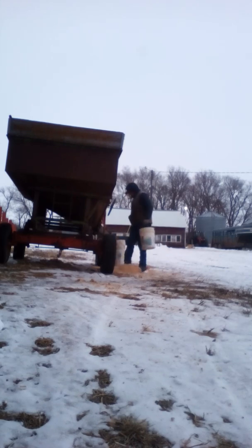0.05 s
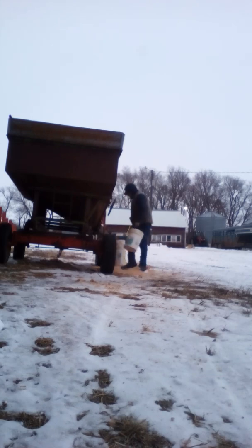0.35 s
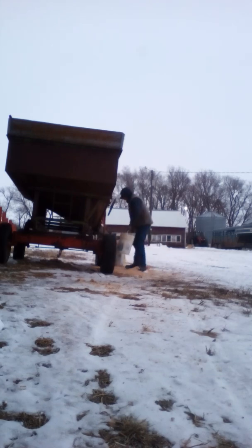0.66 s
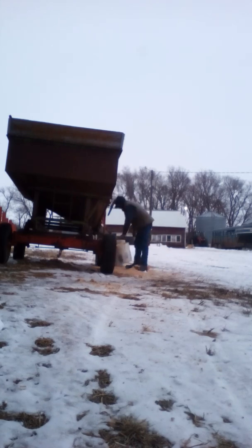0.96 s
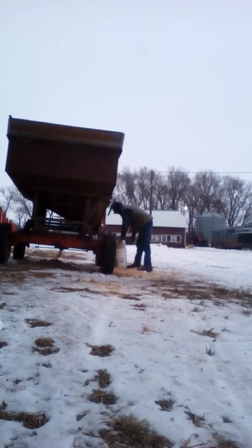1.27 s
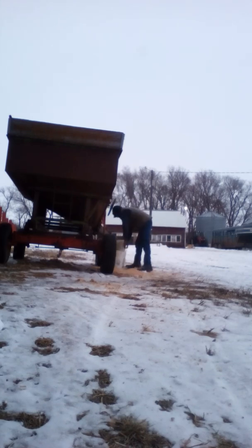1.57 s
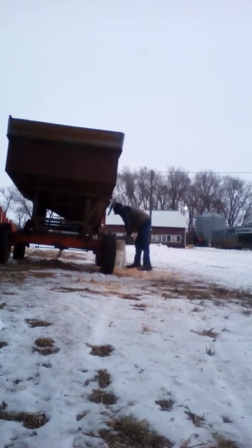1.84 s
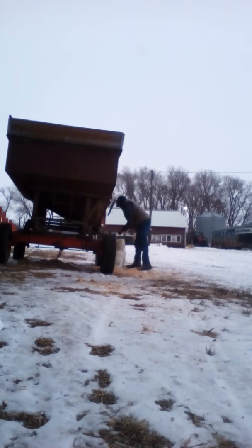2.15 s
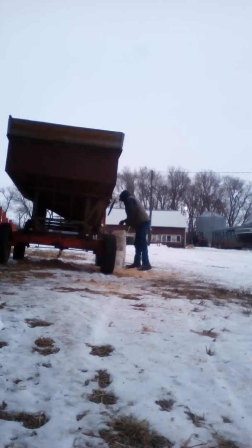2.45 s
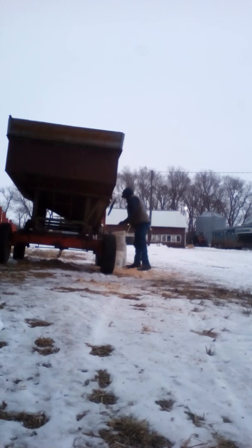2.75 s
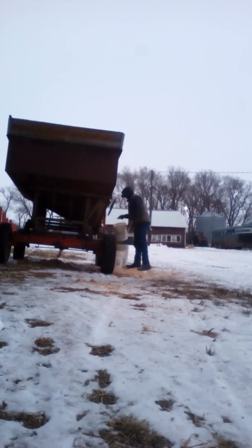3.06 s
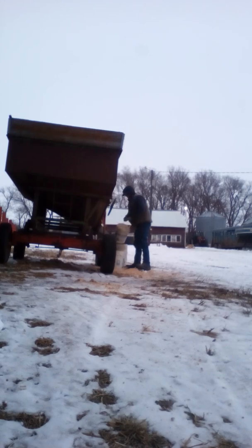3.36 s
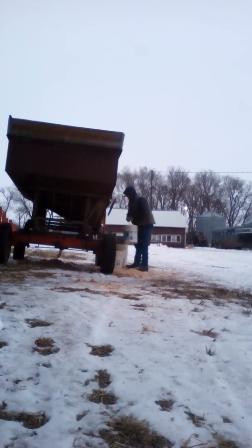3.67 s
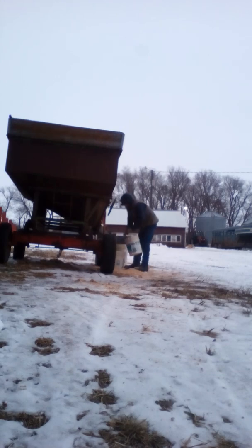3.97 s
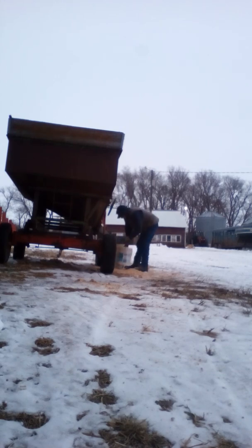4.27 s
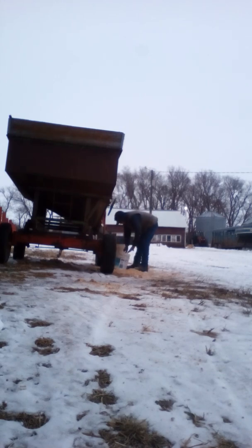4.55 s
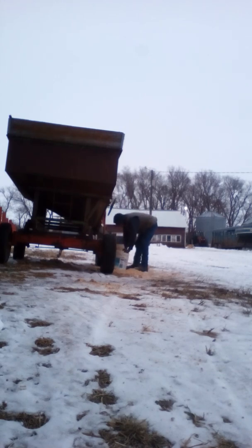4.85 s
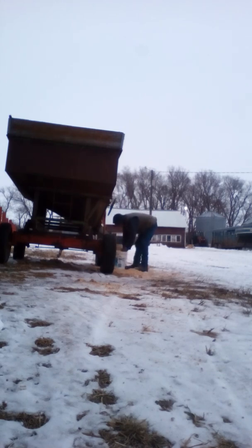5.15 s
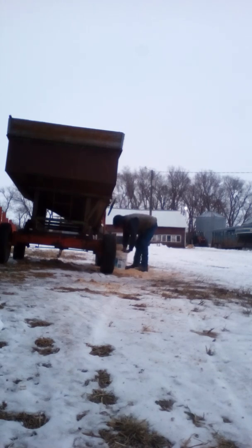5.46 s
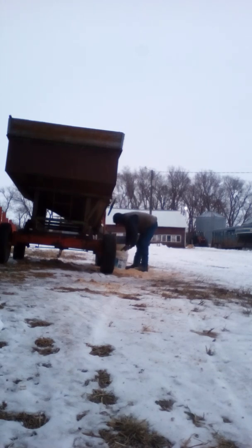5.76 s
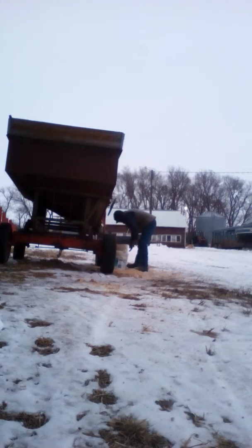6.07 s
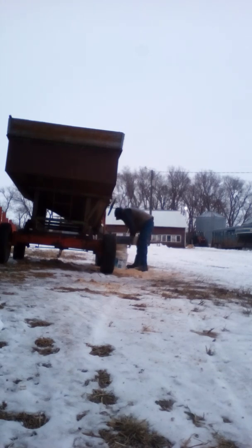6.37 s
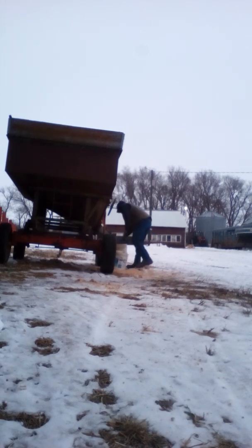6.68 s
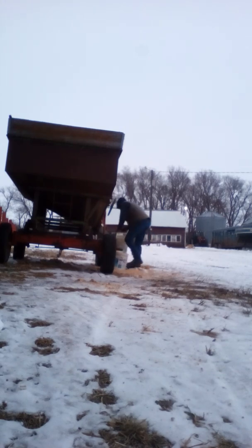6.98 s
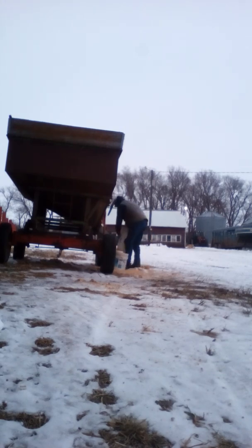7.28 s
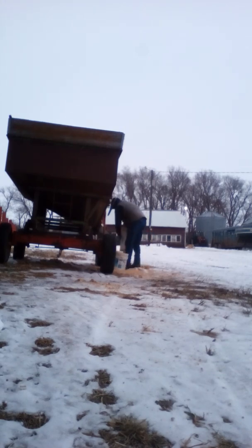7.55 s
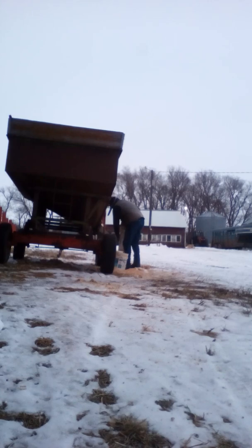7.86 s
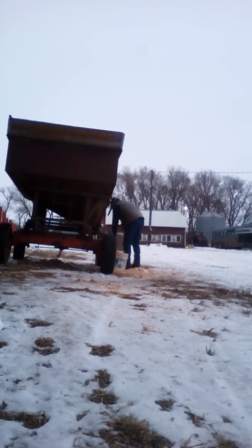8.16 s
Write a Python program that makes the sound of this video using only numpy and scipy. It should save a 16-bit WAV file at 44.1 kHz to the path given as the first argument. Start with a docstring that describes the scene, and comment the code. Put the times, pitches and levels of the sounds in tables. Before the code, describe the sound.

Plastic buckets and loose grain are handled over a faint hiss, with a low rumble coming and going. It starts quietly with dull scuffs and a faint scrape around 1 second. At 1.7 seconds a bucket knocks hollowly against a wagon, followed by two lighter knocks and small rattles of grain. Around 2.8 seconds a loaded bucket lands with a deep thud and kernels rush against the plastic. After soft scuffing, another thud and rattle come at 4.4 seconds, then a sharp, ringing knock at 4.6. The handle creaks briefly near 5 seconds, among lighter knocks, rubbing and grain surges until 5.5. From 6 to 8 seconds it is quieter, with thin trickles, soft low bumps, scuffs and a small creak. At 8.2 seconds a heavy thud arrives with a last burst of rattling grain.

```python
"""Two plastic buckets knock against a feed wagon and thud on the ground.
Knocks ring the modes of walls and bottom; a landing is one deep bounce and a dull slap.
Loose grain rattles in as surges and trickles of random kernel impacts on the plastic.
A handle creaks by stick-slip, boots and buckets scuff, air drones in a jostled bucket.
Soft bumps, one faint scrape and a low rumble come and go over a faint hiss."""
import sys
import numpy as np
from scipy import signal
from scipy.fft import rfft, irfft, next_fast_len
from scipy.io import wavfile
from scipy.ndimage import uniform_filter1d, map_coordinates

SR = 44100
rng = np.random.default_rng(int(sys.argv[2]) if len(sys.argv) > 2 else 0)


def put_to_file(sound):
    """Save the sound as 16-bit audio at rate SR, in the file named by the first command-line argument."""
    columns = np.atleast_2d(sound).T  # one column per channel
    safe = np.clip(columns, -1, 1)
    whole_steps = np.round(safe * 32767)
    wavfile.write(sys.argv[1], SR, whole_steps.astype(np.int16))


N = 366988
TIME_S = np.arange(N) / SR
AGE_S = TIME_S[:SR * 3 // 4]   # time axis of one event

# bucket wall resonances: centre_hz, width_hz, lift_db
WALL_RESONANCES = [(530, 18, 4), (755, 33, 11), (1080, 110, 7), (1521, 55, 7), (1940, 41, 3.5),
                   (2455, 67, 5), (3134, 98, 6.5)]
# harder contacts are brighter and quicker: strength_db, edge_hz, rise_s
CONTACT_HARDNESS = [(-49, 2900, 0.013), (-30, 3750, .011), (-29, 4800, 0.011), (-12, 6500, .004)]


def from_db(db):
    """Decibels to gain."""
    return 10 ** (np.asarray(db) / 20)


def unit_rms(x):
    """Scale to rms 1."""
    return x / np.sqrt(np.mean(x ** 2) + 1e-20)


def at_hz(points, hz):
    """Read a table on a log-frequency axis."""
    points_hz, values = np.transpose(points)
    return np.interp(np.log(hz), np.log(points_hz), values)


def add(out, start_s, sound):
    """Mix a sound in at start_s."""
    start = max(round(start_s * SR), 0)
    out[start:start + len(sound)] += sound[:max(N - start, 0)]


def colour(x, spectrum, tilt_db_per_oct=0, peaks=()):
    """Give a flat excitation a spectrum, midrange tilt and resonances; rms 1."""
    size = next_fast_len(len(x))
    hz = np.maximum(np.arange(size // 2 + 1) * SR / size, 1)
    level_db = at_hz(spectrum, hz) + tilt_db_per_oct * np.log2(np.clip(hz, 400, 3000))
    for centre_hz, width_hz, lift_db in peaks:
        level_db += lift_db / (1 + (2 * (hz - centre_hz) / width_hz) ** 2)
    low_cut = np.minimum(hz / spectrum[0][0], 1) ** 2
    return unit_rms(irfft(rfft(x, size) * from_db(level_db) * low_cut, size)[:len(x)])


def swell(rise_s, hold_s, t60_s, age_s=AGE_S):
    """Contact envelope: rise, then decay from hold_s on."""
    attack = np.sin(np.pi / 2 * np.minimum(age_s / rise_s, 1)) ** 2
    return attack * from_db(-60 * np.maximum(age_s - hold_s, 0) / t60_s)


def spells(rows, rise_s, t60_s):
    """Gain curve of overlapping swells; powers add."""
    power = np.zeros(N)
    for start_s, length_s, level_db in rows:
        add(power, start_s, (from_db(level_db) * swell(rise_s, length_s, t60_s, TIME_S[:2 * SR])) ** 2)
    return np.sqrt(power)


def tone(hz):
    """Sine, one event long."""
    return np.sin(2 * np.pi * hz * AGE_S)


def noise(samples=len(AGE_S)):
    """White noise, by default one event long."""
    return rng.standard_normal(samples)


def impacts(samples, rate_per_s, spread_db):
    """Random impulses of uneven size."""
    sizes = from_db(spread_db * np.minimum(rng.exponential(1, samples), 4))
    return (rng.random(samples) < rate_per_s / SR) * sizes * noise(samples)


def lowpass(x, edge_hz, order=2):
    """Butterworth low-pass."""
    return signal.sosfilt(signal.butter(order, edge_hz, fs=SR, output="sos"), x)


def mottled(x, depth_db, patch_s=0.1):
    """Narrow bands swell and fade at random; rms 1."""
    frames = signal.stft(x, nperseg=1024)[2]
    band, frame = np.indices(frames.shape)
    patch_position = [band / 1.5, frame * 512 / SR / patch_s]
    patches = rng.standard_normal((len(band), int(patch_position[1].max()) + 2))
    flicker = unit_rms(map_coordinates(patches, patch_position, order=1))
    gain = from_db(depth_db * np.clip(flicker, -2, 2))
    return unit_rms(signal.istft(frames * gain)[1][:len(x)])


def evened(x, window_s=0.18):
    """Divide out the running rms."""
    return x / np.sqrt(uniform_filter1d(x ** 2, int(window_s * SR)) + 1e-3)


def softened(x, strength_db, leak_db=-22):
    """A gentle contact loses most of its treble."""
    strengths_db, edges_hz, _ = np.transpose(CONTACT_HARDNESS)
    edge_hz = np.interp(strength_db, strengths_db, edges_hz)
    return lowpass(x, edge_hz, order=4) + from_db(leak_db) * x


def hiss(level_db=-72):
    """Faint, flickering background noise."""
    # hiss spectrum: freq_hz, density_db
    spectrum = [(40, 7.5), (150, 10.5), (280, 8), (450, -3), (1200, -6), (2400, -2), (4000, -1), (5200, 1),
                (6500, -1), (7800, -16.5), (13500, -17), (15000, -21)]
    return from_db(level_db) * mottled(colour(noise(N), spectrum), depth_db=3, patch_s=0.12)


def grain():
    """Kernels patter on plastic: thin trickles, and surges whose last kernels settle slowly."""
    # kernel impact spectrum: freq_hz, density_db
    spectrum = [(200, -7), (400, -8), (650, -7.5), (850, -6), (1100, -2), (1350, -5), (1800, 0),
                (2600, -1.5), (3300, -10), (4300, -13), (5400, -28), (8000, -55), (14000, -49.5)]
    # thin flows: start_s, length_s, level_db
    trickles = [(0.0, 0.034, -71), (1.02, 0.58, -79), (2.06, 0.056, -55.5), (2.25, 0.56, -72.5),
                (2.8, 0.18, -51.5), (4.32, 0.21, -55), (4.7, 0.15, -62.5), (4.88, 0.35, -56.5),
                (5.25, 0.27, -69), (6.42, 0.34, -70), (7.56, 0.86, -71.5)]
    # sudden slides: start_s, strength_db, tilt_db_per_oct
    surges = [(0.187, -52.5, -2.5), (1.412, -49.5, -8.5), (1.892, -45, 6.5), (1.926, -40.5, -1.5),
              (1.958, -38, 1), (2.011, -36.5, 1), (2.119, -33, -2.5), (2.467, -47, 6.5), (2.745, -29, -5),
              (2.765, -21, 0), (2.809, -32, 0), (2.893, -30.5, 1), (2.922, -29.5, -1.5), (3.0, -39, -1),
              (4.364, -21, -9), (4.43, -26.5, -7), (5.212, -37.5, -9), (5.413, -35, -9),
              (5.444, -36.5, -0.5), (6.208, -43.5, -2.5), (6.265, -43.5, -0.5), (6.314, -47, -2),
              (6.447, -49.5, 3), (6.485, -45.5, 3), (6.523, -42, -1), (6.732, -44.5, -5), (7.529, -42, 5.5),
              (7.622, -48, 13), (7.772, -47.5, 6), (7.818, -46.5, 3.5), (8.187, -26, -1), (8.21, -27, 1.5),
              (8.228, -24, -2), (8.259, -25.5, -0.5), (8.285, -35.5, -12)]
    trickle = colour(impacts(N, rate_per_s=1300, spread_db=0.5), spectrum, peaks=WALL_RESONANCES)
    trickle = mottled(softened(trickle, strength_db=-45.5), depth_db=10.5)
    out = spells(trickles, rise_s=0.036, t60_s=0.37) * trickle
    strengths_db, _, rises_s = np.transpose(CONTACT_HARDNESS)
    for start_s, strength_db, tilt_db_per_oct in surges:
        kernels = impacts(len(AGE_S), rate_per_s=5000, spread_db=1)
        patter = mottled(colour(kernels, spectrum, tilt_db_per_oct, WALL_RESONANCES), depth_db=6)
        rise_s = np.interp(strength_db, strengths_db, rises_s)
        rush = swell(rise_s, hold_s=rise_s + 0.0087, t60_s=0.2)
        settle = from_db(-15) * swell(rise_s, hold_s=0.02, t60_s=0.38)
        surge = from_db(strength_db - 10.5) * patter * np.hypot(rush, settle)
        add(out, start_s, softened(surge, strength_db))
    return out


def scuffs(hollow_lift_db=15):
    """Dull, gritty rubbing of boots and buckets, each stroke with its own hollow resonance."""
    # rubbing strokes: start_s, length_s, level_db, hollow_hz
    strokes = [(0.0, 0.011, -53, 440), (0.036, 0.041, -57, 300), (0.27, 0.11, -61, 323),
               (0.342, 0.056, -55, 403), (0.918, .06, -64, 710), (0.998, 0.06, -54.5, 690),
               (1.019, 0.042, -56, 360), (3.556, 0.084, -53.5, 385), (3.755, 0.065, -60.5, 357),
               (3.836, 0.17, -64, 325), (4.32, 0.049, -58.5, 400), (4.679, 0.16, -54, 484),
               (5.137, .09, -47.5, 430), (5.33, 0.15, -49, 400), (5.416, 0.065, -40.5, 464),
               (5.499, 0.066, -57, 466), (5.583, 0.11, -65, 410), (5.886, 0.069, -62, 396),
               (6.33, .05, -61, 388), (6.417, .27, -71, 383), (6.712, 0.033, -57, 815),
               (7.16, .035, -63.5, 405), (7.377, 0.084, -72.5, 738), (7.768, .16, -53, 340),
               (7.94, 0.42, -64.5, 397)]
    # grit spectrum: freq_hz, density_db
    spectrum = [(120, -20), (220, 0), (340, 0), (480, -6), (600, -3), (760, -3.5), (1000, -18.5),
                (1600, -22.5), (4000, -59)]
    out = np.zeros(N)
    for start_s, length_s, level_db, hollow_hz in strokes:
        hollow = (hollow_hz, 0.51 * hollow_hz, hollow_lift_db)
        grit = colour(impacts(len(AGE_S), rate_per_s=1200, spread_db=-2), spectrum, peaks=[hollow])
        grit = evened(mottled(grit, depth_db=6.5), window_s=0.14)
        add(out, start_s, from_db(level_db) * grit * swell(0.032, length_s, t60_s=0.21))
    return out


def drone_and_rumble(cavity_hz=145.4, width_hz=35):
    """Air drones in a jostled bucket; a low rumble comes and goes, with some drone in it."""
    # bucket jostles: start_s, length_s, level_db
    jostles = [(0.74, 0.27, -69), (1.9, 0.056, -52.5), (2.05, .21, -48), (2.56, 0.066, -49.5),
               (3.41, 0.19, -57), (4.33, 0.031, -53), (4.51, 0.16, -53.5), (4.86, 0.18, -57),
               (5.19, 0.3, -50.5), (7.54, 0.042, -56.5), (8.11, 0.094, -50)]
    # rumble spells: start_s, length_s, level_db
    rumbles = [(0.9, 0.48, -68), (1.52, 0.35, -65.5), (1.98, 0.58, -57), (2.85, 0.13, -49),
               (3.19, 0.033, -64.5), (3.34, 0.18, -57.5), (3.6, 0.4, -62.5), (4.5, 0.31, -57.5),
               (4.87, 0.7, -70), (5.78, 0.055, -65.5), (5.96, 0.27, -62), (6.44, 0.8, -72.5),
               (6.89, .22, -56.5), (7.48, .44, -63), (7.93, 0.18, -49.5)]
    # rumble spectrum: freq_hz, density_db
    spectrum = [(20, -15), (45, -1), (80, 0.5), (110, -3.5), (160, -21.5), (300, -40), (1000, -80)]
    edges_hz = cavity_hz * np.exp(np.array([-0.5, 0.5]) * width_hz / cavity_hz)
    cavity = signal.butter(2, edges_hz, "band", fs=SR, output="sos")
    drone = evened(unit_rms(signal.sosfilt(cavity, noise(N))))
    rumble = evened(colour(noise(N), spectrum))
    rumble_gain = spells(rumbles, rise_s=0.016, t60_s=0.25)
    jostle_gain = spells(jostles, rise_s=0.024, t60_s=0.095)
    return rumble_gain * rumble + np.hypot(jostle_gain, from_db(-9) * rumble_gain) * drone


def creaks(roughness=0.39, detune=0.047):
    """The handle sticks and slips; each slip is a short ring shaken by friction."""
    # slips in the sockets: start_s, strength_db
    slips = [(1.032, -52), (4.934, -26.5), (4.938, -34.5), (4.953, -37), (4.969, -39.5), (4.981, -29),
             (4.984, -35), (6.735, -37.5), (6.75, -46.5), (7.382, -54.5)]
    # handle modes: pitch_hz, gain_db, t60_s
    modes = [(891, -2.5, 0.079), (1034, 2.5, 0.038), (2060, -15, 0.032)]
    out = np.zeros(N)
    for start_s, strength_db in slips:
        ring = sum(from_db(gain_db) * tone(hz * rng.normal(1, detune)) * swell(0.0027, 0.0021, t60_s)
                   for hz, gain_db, t60_s in modes)
        friction = unit_rms(lowpass(noise(), edge_hz=450))
        add(out, start_s, from_db(strength_db - 7.5) * ring * (1 + roughness * friction))
    return out


def scrape(start_s=1.06, level_db=-70, start_hz=1900, rise_hz_per_s=1000):
    """A narrow band of friction noise, gliding upward."""
    out = np.zeros(N)
    friction = unit_rms(lowpass(noise(), edge_hz=220))
    glide = np.sin(2 * np.pi * np.cumsum(start_hz + rise_hz_per_s * AGE_S) / SR)
    add(out, start_s, from_db(level_db) * friction * glide * swell(0.044, hold_s=0.22, t60_s=0.2))
    return out


def bumps(mean_hz=77.5):
    """A few deep cycles each, at scattered pitches."""
    # soft bumps: start_s, level_db
    contacts = [(1.098, -50.5), (4.202, -51.5), (5.956, -48), (6.115, -48.5), (6.167, -45), (7.086, -42),
                (7.47, -45.5), (7.684, -61), (7.933, -40)]
    out = np.zeros(N)
    for start_s, level_db in contacts:
        bump = tone(mean_hz * rng.normal(1, 0.1)) * swell(0.0047, 0.021, t60_s=0.071)
        add(out, start_s, from_db(level_db) * bump)
    return out


def thuds(base_hz=226, slap_db_per_db=1.67):
    """A loaded bucket lands: deep bounce, short ring of the base, dull slap that grows fastest."""
    # landings and nudges: start_s, bounce_db, bounce_hz, base_db
    landings = [(1.407, -34, 149, -55), (1.74, -40.5, 136, -38), (2.028, -36.5, 141, -60),
                (2.129, -31.5, 156.3, -43.5), (2.471, -35.5, 147, -72), (2.755, -14.5, 92.8, -39),
                (2.801, -24.5, 127, -53), (2.831, -26, 135.8, -42), (2.899, -36.5, 123, -43.5),
                (4.355, -18, 132.5, -16), (4.423, -36.5, 141, -38), (4.45, -33.5, 63.4, -44),
                (5.152, -30, 130, -42), (5.352, -38.5, 147, -60), (5.443, -42, 154.3, -33),
                (8.184, -10.5, 118.8, -33), (8.211, -14.5, 84.5, -46)]
    # slap spectrum: freq_hz, density_db
    spectrum = [(50, -12.5), (100, -2), (220, -3.5), (330, -2), (500, -9), (900, -23.5), (2000, -64.5),
                (5000, -88)]
    out = np.zeros(N)
    for start_s, bounce_db, bounce_hz, base_db in landings:
        bounce = from_db(bounce_db) * tone(bounce_hz) * swell(0.0096, 0.0047, t60_s=0.23)
        slap_db = slap_db_per_db * bounce_db - 7
        slap = from_db(slap_db) * colour(noise(), spectrum) * swell(0.0071, 0.0076, t60_s=0.2)
        base = from_db(base_db) * tone(base_hz) * swell(0.0094, 0.0073, t60_s=0.085)
        add(out, start_s, bounce + slap + base)
    return out


def wall_clack(tilt_db_per_oct, echo_db=-11.5):
    """Dense wall modes, each octave with its own decay, then a dull echo off the wagon."""
    # wall flexing spectrum: freq_hz, density_db
    spectrum = [(100, -9.5), (220, -5), (400, -8.5), (650, -6), (1150, 0.5), (1900, -4), (2900, -4),
                (4000, -12.5), (5200, -19), (6500, -31), (8000, -46), (12000, -32.5), (15000, -36)]
    # wall decay: freq_hz, t60_s
    decay = [(100, 0.29), (260, 0.059), (700, 0.13), (1840, 0.15), (4850, 0.082), (12000, 0.11)]
    flexing = mottled(colour(noise(), spectrum, tilt_db_per_oct), depth_db=4.5, patch_s=0.2)
    bins = rfft(flexing)
    hz = np.maximum(np.arange(len(bins)) * SR / len(AGE_S), 1)
    clack = 0
    for centre_hz in 125 * 2 ** np.arange(8):
        octave = irfft(bins * np.maximum(1 - abs(np.log2(hz / centre_hz)), 0), len(AGE_S))
        clack += octave * swell(0.0019, 0.014, t60_s=at_hz(decay, centre_hz))
    echo = colour(noise(), spectrum, tilt_db_per_oct=-4.5, peaks=WALL_RESONANCES)
    return clack + from_db(echo_db) * echo * swell(0.02, 0, t60_s=0.48)


def knocks(bottom_below_hz=650, detune=0.006):
    """A blow cracks, the walls clack and the bottom booms; load and grip detune the modes."""
    # blows on a bucket: start_s, strength_db, boom_db, tilt_db_per_oct
    blows = [(1.737, -18, -34, -1), (2.021, -26, -29, -2), (2.181, -29.5, -43.5, -3.5),
             (4.473, -26, -35, -5), (4.613, -14, -19.5, -1), (4.861, -31, -36, -1), (5.037, -35, -39, 2),
             (5.177, -35.5, -42, -7.5), (5.444, -33, -40, -2.5), (8.19, -35, -23, 19)]
    # modes of each bucket: pitch_hz, gain_db, t60_s
    first_bucket = [(255, -17.5, 0.25), (503, 1.5, 0.21), (549, -12, 0.3), (761, -9.5, .26),
                    (930, -12.5, 0.22), (1187, -4.5, 0.19), (1208, -4.5, 0.093), (1320, -29.5, .11),
                    (1593, -22.5, 0.45), (1910, -13.5, 0.17), (2590, -9, 0.074)]
    second_bucket = [(223, -16, 0.17), (299, -18.5, .17), (387, -11.5, 0.25), (565.8, 1.5, .2),
                     (679, 4, 0.065), (762, -7.5, 0.24), (806, -4, 0.21), (992, -10, .22), (1148, -6, 0.22),
                     (1310, -19, 0.08), (1523, -6, 0.12), (1590, -13, 0.15), (1983, -11.5, 0.2),
                     (2802, -20.5, .17), (3130, -6, 0.11)]
    out = np.zeros(N)
    for start_s, strength_db, boom_db, tilt_db_per_oct in blows:
        modes = second_bucket if 4 < start_s < 7 else first_bucket
        wall_db, bottom_db = strength_db - 12.5, boom_db - 0.5
        crack_db = 2 * strength_db - 29   # grows with force squared
        crack = from_db(crack_db) * noise() * swell(0.001, 0.003, t60_s=0.03)
        body = from_db(wall_db) * wall_clack(tilt_db_per_oct)
        for hz, gain_db, t60_s in modes:
            level_db = gain_db + (bottom_db if hz < bottom_below_hz else wall_db)
            ring = rng.choice([-1, 1]) * tone(hz * rng.normal(1, detune))
            body += from_db(level_db) * ring * swell(0.0061, 0.0037, t60_s)
        add(out, start_s, crack + softened(body, strength_db, leak_db=-13.5))
    return out


def scene():
    """Buckets and grain over hiss, mono."""
    mix = hiss() + knocks() + thuds() + bumps() + grain()
    mix += creaks() + scrape() + scuffs() + drone_and_rumble()
    return mix[None]


def record(dry):
    """Steep elliptic low-pass."""
    cutoff_hz = 14900
    return signal.sosfilt(signal.ellip(10, 0.1, 70, cutoff_hz, fs=SR, output="sos"), dry)


dry = scene()
out = record(dry)
put_to_file(out)
```